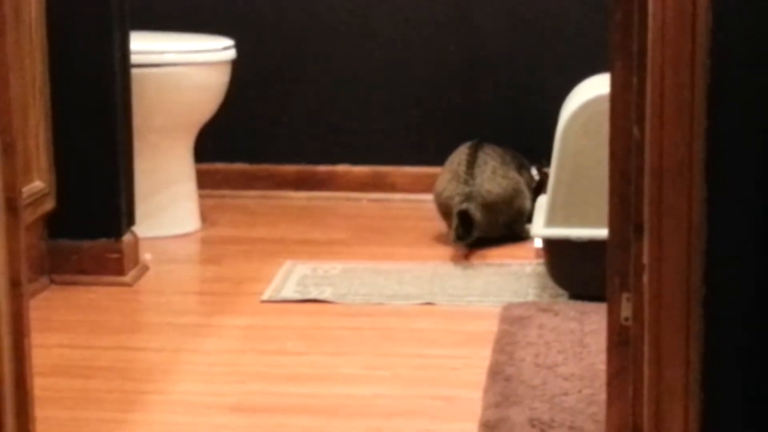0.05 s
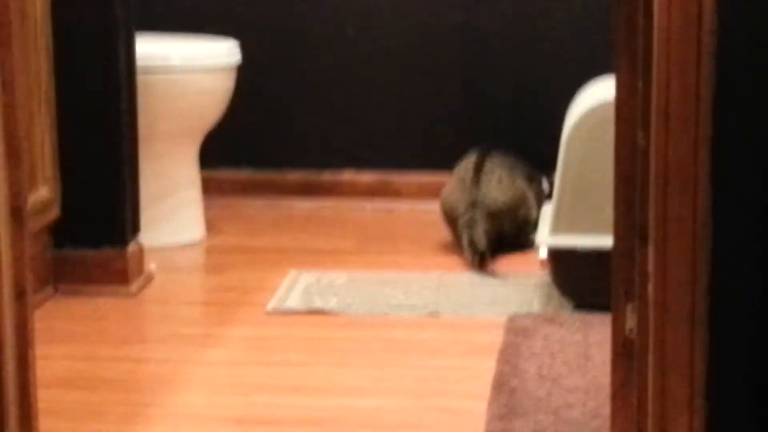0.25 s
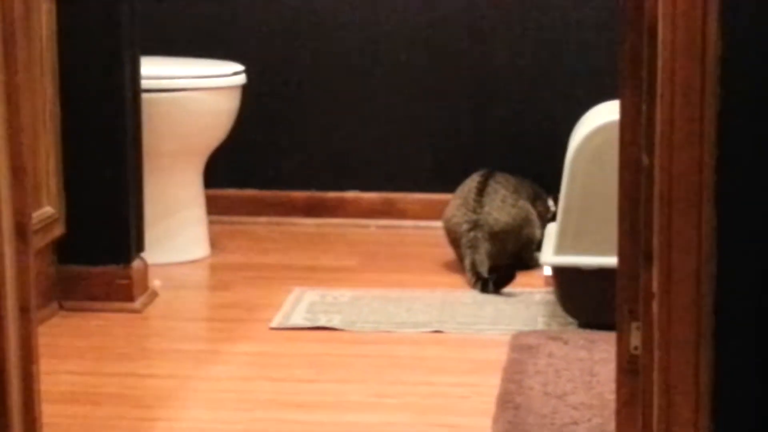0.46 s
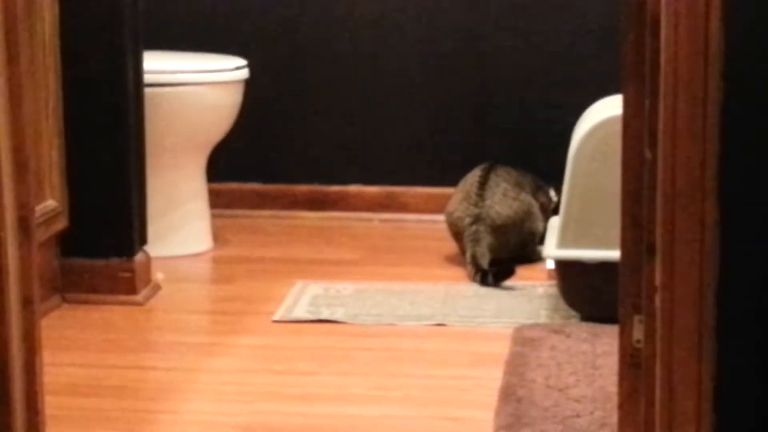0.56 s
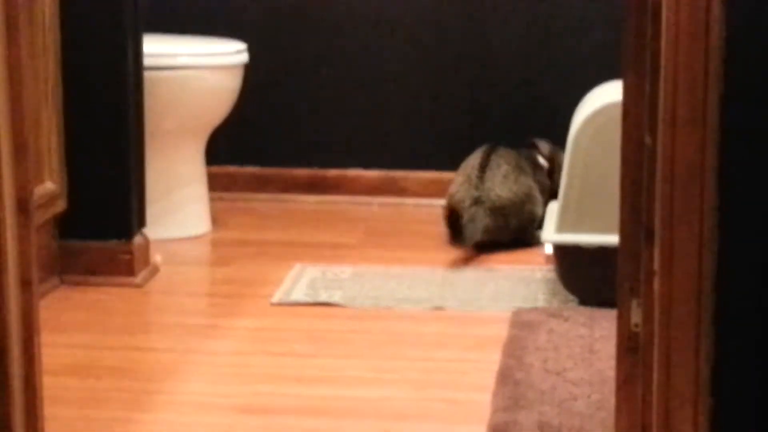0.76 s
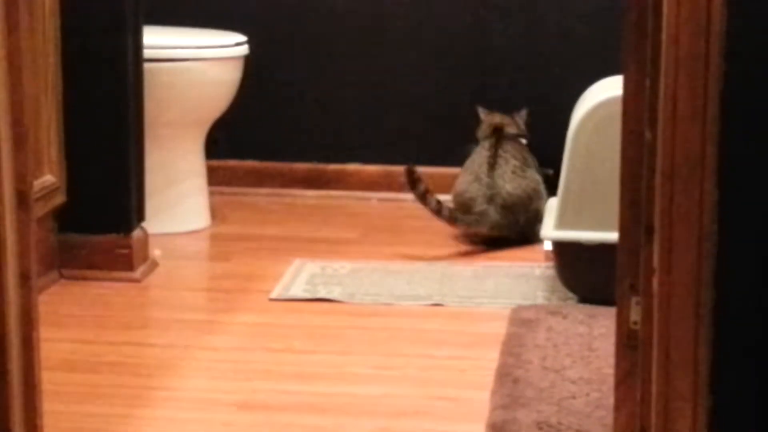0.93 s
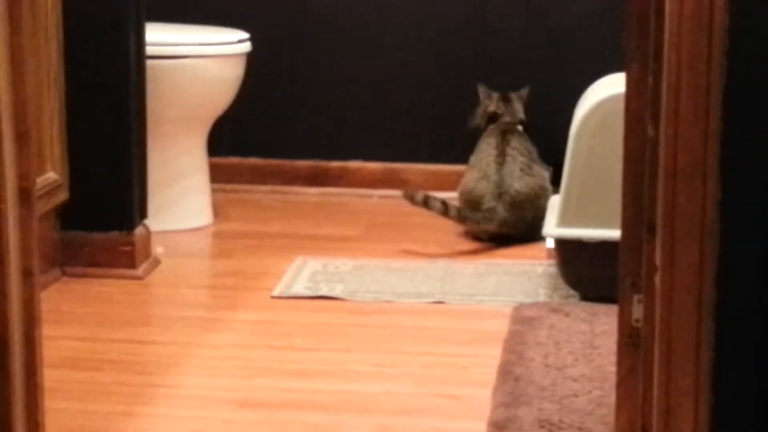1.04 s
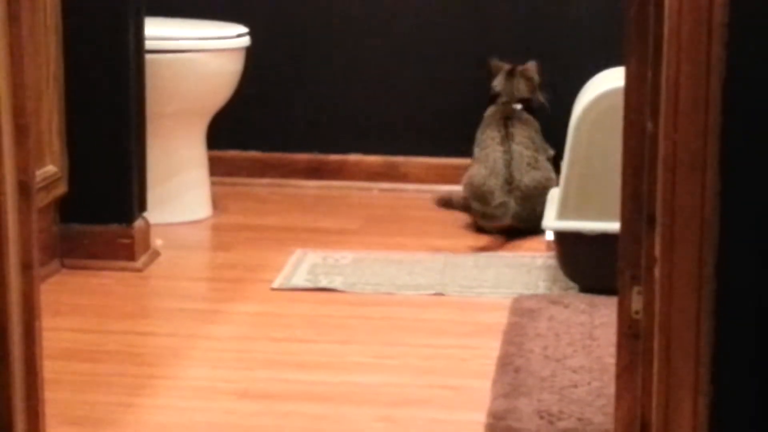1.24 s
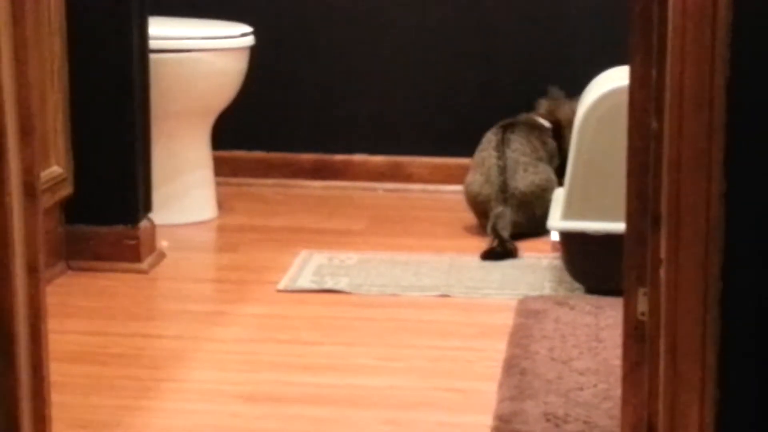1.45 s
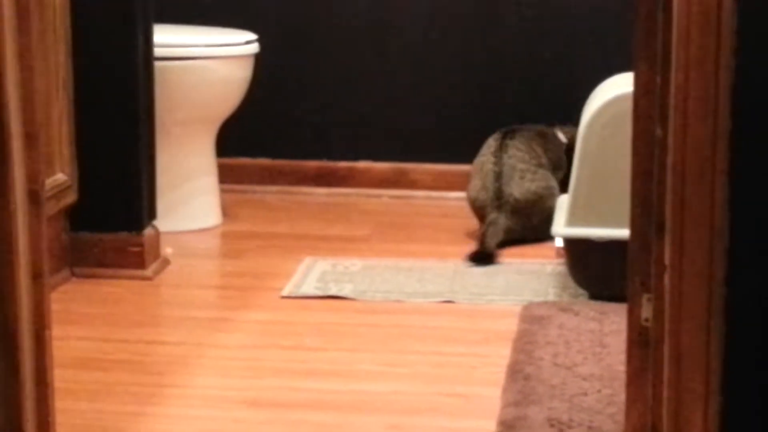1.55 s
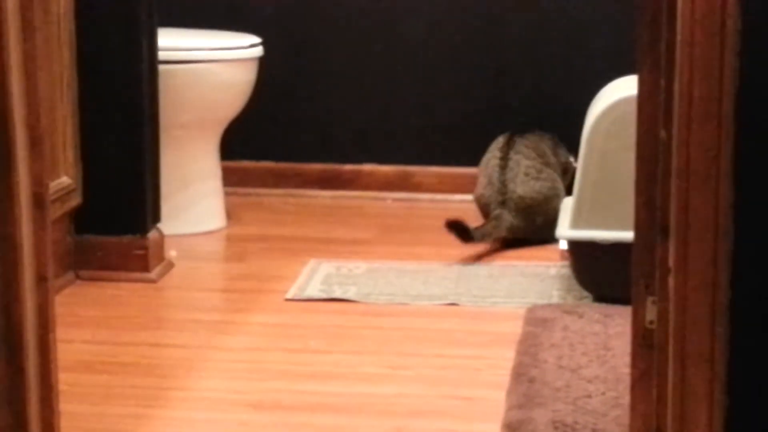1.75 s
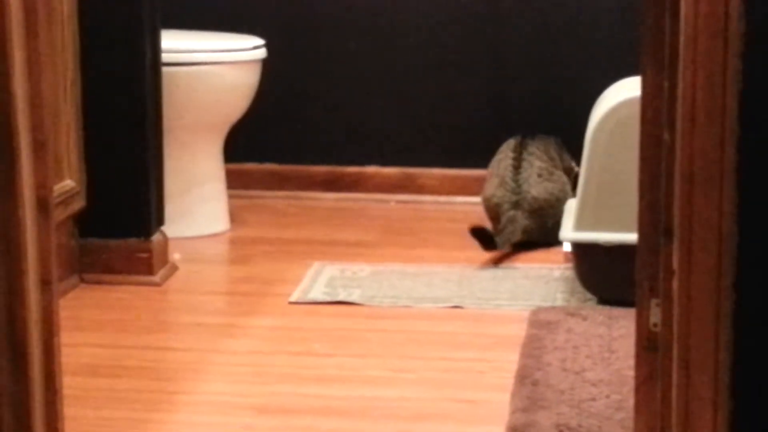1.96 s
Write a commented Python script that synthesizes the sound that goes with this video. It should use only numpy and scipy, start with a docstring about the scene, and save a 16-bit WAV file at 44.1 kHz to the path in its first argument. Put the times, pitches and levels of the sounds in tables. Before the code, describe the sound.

Something, probably a finger, rubs close on the microphone's left side: short strokes from 0.2 seconds, then one long dry slide from 0.4 to 1 second, snagging with small ticks and knocks. From 0.9 seconds a cat's paws scuffle softly by its litter box and its metal collar tags jingle faintly. A dull scuff comes at 2 seconds. The small bathroom rumbles and hisses quietly throughout.

```python
"""A small quiet bathroom rumbles and hisses throughout, and a tag on a cat's collar rings faintly.
In the first second something, probably a finger, rubs close by the left microphone port: a few short
strokes, then one long dry slide, snagging now and then and knocking the casing. From 0.9 s the cat's
paws scuffle by its litter box and its metal tags jingle. One last dull scuff comes at the very end."""
import sys
import numpy as np
from scipy import signal
from scipy.fft import rfft, irfft, next_fast_len
from scipy.io import wavfile

SR = 44100
rng = np.random.default_rng(int(sys.argv[2]) if len(sys.argv) > 2 else 0)


def to_wav(sig):
    """Store sig (one row per channel, or 1-D mono) as 16-bit WAV at the path in sys.argv[1].

    Samples outside -1..1 are clipped; the rate is SR.
    """
    pcm = np.clip(np.atleast_2d(sig), -1, 1) * 32767
    pcm = np.round(pcm).astype(np.int16)
    wavfile.write(sys.argv[1], SR, pcm.T)  # frames by channels


N = 88200

# spectrum of light brushing and of its ticks: frequency_hz, density_db
BRUSH_SPECTRUM = [(30, -30), (100, -11), (300, -13), (500, -13), (800, -12.5), (1300, -3), (1900, -2.5),
                  (3000, -0.5), (4400, -3), (6000, -10.5), (9000, -11), (12000, -13), (14500, -19.5)]


def amp(db):
    """Decibels to amplitude ratio."""
    return 10 ** (np.asarray(db) / 20)


def unit(x):
    """Normalisation to rms 1."""
    return x / np.sqrt(np.mean(x ** 2) + 1e-20)


def along(points, hz):
    """Interpolation of (frequency_hz, value) points on a logarithmic frequency axis."""
    frequencies, values = np.transpose(points)
    return np.interp(np.log(hz + 1), np.log(frequencies + 1), values)


def clock():
    """Time of every sample in seconds."""
    return np.arange(N) / SR


def curves(rows):
    """Linear interpolation in time: one curve for each column after the first."""
    times, *columns = np.transpose(rows)
    return [np.interp(clock(), times, column) for column in columns]


def filtered(x, response):
    """Linear filtering: the spectrum of x is multiplied by a frequency response."""
    size = next_fast_len(N + SR // 2)
    return irfft(rfft(x, size) * response(np.fft.rfftfreq(size, 1 / SR)), size)[..., :N]


def coloured(x, spectrum):
    """Spectral shaping of x, at rms 1."""
    return unit(filtered(x, lambda hz: amp(along(spectrum, hz))))


def envelope(start, rise, hold, t60):
    """Linear rise, hold, then exponential decay by 60 dB in t60 seconds."""
    t = clock() - start
    return np.clip(t / rise, 0, 1) * amp(-60 * np.maximum(t - rise - hold, 0) / t60)


def background(hum_hz=119.3):
    """Stationary noise: room rumble and microphone hiss, independent at each port, over mains hum."""
    # both spectra: frequency_hz, density_db
    rumble_spectrum = [(20, -31), (45, -15), (80, -5.5), (120, -2), (170, -6), (260, -9.5), (400, -12),
                       (600, -14.5), (900, -19.5), (1500, -27), (3000, -52)]
    hiss_spectrum = [(300, -12), (1200, 5), (2500, 3.5), (4500, 0), (6200, -3), (8000, -0.5), (14500, -2)]
    rumble = amp(-61.5) * coloured(rng.standard_normal((2, N)), rumble_spectrum)
    hiss = amp([[-64.8], [-66.2]]) * coloured(rng.standard_normal((2, N)), hiss_spectrum)
    hum = amp(-70) * np.sin(2 * np.pi * (hum_hz * clock() + rng.random()))
    return rumble + hiss + hum


def tag_mode(start, hz, t60, blur_rad=0, attack_s=.002):
    """A normal mode of a struck metal tag is a damped sinusoid."""
    phase = 2 * np.pi * (hz * clock() + rng.random()) + blur_rad
    return envelope(start, attack_s, 0, t60) * np.sin(phase)


def in_room(x, left_bias_db, wet_db=-3):
    """Reverberation adds a diffuse tail; a level difference between the ports places x to the left."""
    # reverberation time of the bathroom: frequency_hz, t60_s
    decay_times = [(200, .4), (2000, .35), (6000, .3), (14000, .2)]
    hz, t, noise = signal.stft(rng.standard_normal((2, SR // 2)), SR, nperseg=256)
    decay = amp(-60 * t / along(decay_times, hz)[:, None])
    tail = signal.istft(noise * decay, SR, nperseg=256)[1]
    reverb = signal.fftconvolve(x[None], tail / np.linalg.norm(tail[0]), axes=1)[:, :N]
    return (x + amp(wet_db) * reverb) * amp([[left_bias_db / 2], [-left_bias_db / 2]])


def ringing_tag(pitch_hz=4980, t60_s=.17):
    """Free vibration: one collar tag rings on a single note after each touch."""
    # touches of the tag: start_s, level_db
    touches = [(.003, -73), (.045, -76), (.085, -75), (1.588, -74), (1.643, -67.5), (1.715, -76)]
    return sum(amp(db) * in_room(tag_mode(start, pitch_hz, t60_s), left_bias_db=7)
               for start, db in touches)


def handling():
    """Structure-borne sound: the handled casing rumbles softly at both ports."""
    # swell of the rumble: time_s, level_db
    swell = [(.17, -85), (.27, -64), (.34, -59), (.4, -62), (.5, -68.5), (.72, -65), (.85, -68),
             (1.15, -71), (1.3, -85)]
    # spectrum of the casing: frequency_hz, density_db
    spectrum = [(25, -14), (70, -4), (110, 0), (180, 1), (260, -7), (500, -16), (1000, -33), (3000, -62)]
    level_db, = curves(swell)
    return amp(level_db) * coloured(rng.standard_normal((2, N)), spectrum)


def friction(slips_per_s=8000, slip_share=.19):
    """Stick-slip friction: tiny random slips carry a share of the power, smooth hiss the rest."""
    slips = (rng.random(N) < slips_per_s / SR) * rng.standard_normal(N)
    return np.sqrt(slip_share) * unit(slips) + np.sqrt(1 - slip_share) * rng.standard_normal(N)


def far_port():
    """Transmission loss: the rubbing reaches the right port as a fainter, duller friction noise."""
    # swell at the right port: time_s, level_db
    swell = [(.17, -96), (.185, -58), (.25, -53), (.31, -58.5), (.34, -54), (.365, -57), (.385, -54),
             (.5, -55.5), (.62, -53.5), (.72, -51.5), (.8, -49), (.87, -53), (.92, -50), (.96, -56),
             (1.05, -69)]
    # spectrum there: frequency_hz, density_db
    spectrum = [(30, -5), (100, 6), (200, 8), (450, 1.5), (1000, -0.5), (2200, -2), (3000, -8),
                (4500, -8.5), (6200, -13.5), (14000, -13)]
    level_db, = curves(swell)
    return amp(level_db) * coloured(friction(), spectrum)


def strokes(rows, spectrum):
    """Incoherent addition: overlapping bursts of friction noise sum in power."""
    power = sum((amp(db) * envelope(start, rise, hold, t60)) ** 2 for start, rise, hold, t60, db in rows)
    return np.sqrt(power) * coloured(friction(), spectrum)


def brushes():
    """Brief sliding contacts by the left port give bright bursts of friction noise."""
    # strokes: start_s, rise_s, hold_s, t60_s, level_db
    contacts = [(.179, 0.0033, 0.013, 0.15, -39), (.2145, .012, .017, 0.13, -35.5),
                (.303, 0.022, .004, .1, -53), (.329, 0.0047, .012, .048, -34.5),
                (.363, 0.0058, .008, .1, -54), (.377, 0.0043, 0.014, 0.28, -36.5)]
    return strokes(contacts, BRUSH_SPECTRUM)


def catches(tick_t60_s=.0034):
    """Impulse excitation: each snag of the rub gives a sharp tick and rings the casing's damped modes."""
    # snags: start_s, tick_db, knock_db
    snags = [(.1815, -30, -31), (.331, -42, -41.5), (.379, -39, -43), (.4255, -25, -48),
             (.4378, -22.5, -52), (.719, -30, -39)]
    # casing modes: pitch_hz, gain_db, t60_s
    modes = [(310, -14, 0.036), (502, -10, .018), (719, -5.5, 0.014), (1050, -1.5, 0.01),
             (1421, 0.5, 0.011), (2100, -11, .012)]
    ticks = sum(amp(db) * envelope(start, 1 / SR, 0, tick_t60_s) for start, db, _ in snags)
    knocks = np.zeros(N)
    for start, _, knock_db in snags:
        for hz, gain_db, t60 in modes:
            tone = np.sin(2 * np.pi * (hz * clock() + rng.random()))
            knocks += amp(knock_db + gain_db) * envelope(start, 1 / hz, 0, t60) * tone
    return ticks * coloured(rng.standard_normal(N), BRUSH_SPECTRUM) + knocks


def scuffs():
    """Light contacts give dull friction noise, strongest near 1.5 kHz."""
    # strokes: start_s, rise_s, hold_s, t60_s, level_db
    contacts = [(.255, .018, 0.0067, 0.05, -47.5), (1.989, .012, .01, .1, -45)]
    # spectrum of a scuff: frequency_hz, density_db
    spectrum = [(30, -35), (200, -17), (700, -9), (1050, -6), (1500, 1.5), (2200, -3.5), (3200, -13),
                (6000, -21), (14000, -24)]
    return strokes(contacts, spectrum)


def slide(rasp_edge_hz=2720, treble_edge_hz=5800, gain_db=5, treble_lift_db=1.44, fade_s=.0051):
    """Sustained sliding friction: one long rub swells and dies away in three frequency bands."""
    # relative band levels: time_s, rasp_db, middle_db, treble_db
    band_levels = [(0.426, -44, -46, -50), (0.436, -42, -43.5, -48), (0.51, -50, -48.5, -56),
                   (0.56, -40, -39, -45), (0.608, -42, -41, -48.5), (0.674, -36, -34.5, -43),
                   (0.724, -37, -43, -45.5), (0.77, -43.5, -50.5, -51), (0.804, -45.5, -50, -53),
                   (0.872, -54.5, -61.5, -63.5), (0.918, -53, -56, -60), (0.952, -60, -64, -68),
                   (0.975, -73, -69.5, -70)]
    # spectrum of the rub: frequency_hz, density_db
    spectrum = [(30, -55), (100, -26), (300, -15.5), (500, -16.5), (800, -17), (1050, -13), (1350, -5),
                (1650, -1.5), (2300, 0), (2900, -1.5), (3300, -1), (4200, -4), (5200, -8.5), (6200, -14),
                (8000, -14.5), (11000, -16), (14500, -18)]
    rasp_db, middle_db, treble_db = curves(band_levels)
    rub = coloured(friction(), spectrum)
    rasp = filtered(rub, lambda hz: 1 / (1 + (hz / rasp_edge_hz) ** 8))
    treble = filtered(rub, lambda hz: 1 - 1 / (1 + (hz / treble_edge_hz) ** 8))
    middle = rub - rasp - treble
    mix = amp(rasp_db) * unit(rasp) + amp(middle_db) * unit(middle)
    mix += amp(treble_db + treble_lift_db) * unit(treble)
    inside_s = np.minimum(clock() - band_levels[0][0], band_levels[-1][0] - clock())
    contact = np.clip(inside_s / fade_s + 1, 0, 1)
    return amp(gain_db) * contact * mix


def paws(rise_s=.0072, t60_s=.42):
    """Soft distant impacts: each pat is dull noise that decays like the room's diffuse field."""
    # pats on the floor and box: start_s, level_db
    pats = [(.9, -61), (.975, -65), (1.028, -59), (1.095, -70), (1.225, -76), (1.63, -67), (1.88, -62),
            (1.935, -63)]
    # spectrum of a pat: frequency_hz, density_db
    spectrum = [(100, -16), (220, -4.5), (500, -5.5), (1000, -11), (2500, -14.5), (6000, -22.5),
                (14000, -21.5)]
    loudness = sum(amp(db) * envelope(start, rise_s, 0, t60_s) for start, db in pats)
    return loudness * coloured(rng.standard_normal((2, N)), spectrum)


def rattling_tag(chatter_hz=200, chatter_rad=.59):
    """Phase modulation: the other, loose tag chatters, blurring its cluster of short-lived modes."""
    # contacts between the tags: start_s, level_db
    contacts = [(.902, -54.5), (.917, -51), (.955, -61), (1.026, -53.5), (1.039, -53), (1.057, -60),
                (1.072, -56.5), (1.117, -57), (1.128, -62), (1.209, -71), (1.254, -67), (1.476, -76),
                (1.566, -72), (1.682, -72), (1.762, -62), (1.810, -67), (1.911, -57), (1.996, -62)]
    # tag modes: pitch_hz, gain_db, t60_s
    modes = [(5150, -11, .06), (5230, -6.5, 0.067), (5350, -5.5, .1), (5420, -3, 0.085), (5600, -6.5, .06)]
    slow_noise = filtered(rng.standard_normal(N), lambda hz: np.exp(-(hz / chatter_hz) ** 2))
    blur_rad = chatter_rad * unit(slow_noise)
    out = np.zeros((2, N))
    for start, level_db in contacts:
        jingle = sum(amp(db + rng.normal(0, 1.5)) * tag_mode(start, hz, t60, blur_rad)
                     for hz, db, t60 in modes)
        out += amp(level_db) * in_room(jingle, left_bias_db=12)
    return out


def scene(leak_db=-32.5):
    """Superposition: close rubbing on the left leaks to the right, with the cat and room behind it."""
    near = brushes() + catches() + scuffs() + slide()
    rubbing = np.array([near, amp(leak_db) * near + far_port()])
    return background() + ringing_tag() + handling() + rubbing + paws() + rattling_tag()


def record(dry):
    """Band limiting: an ideal low-pass filter removes everything above 14.7 kHz."""
    return filtered(dry, lambda hz: hz < 14700)


dry = scene()
out = record(dry)
to_wav(out)
```